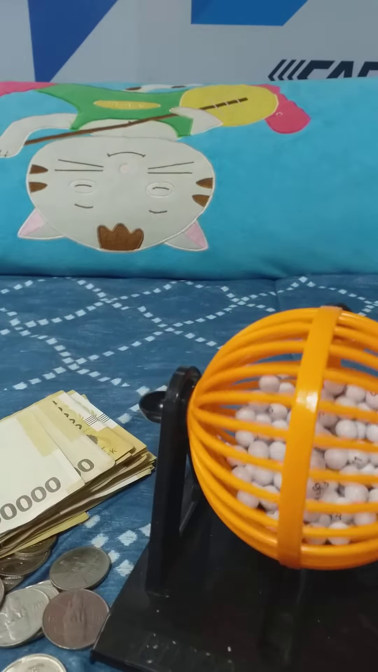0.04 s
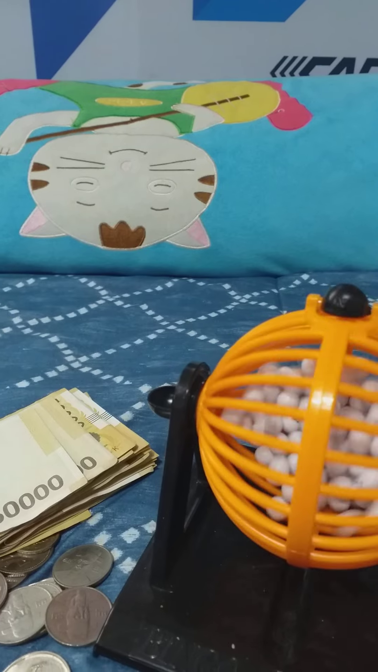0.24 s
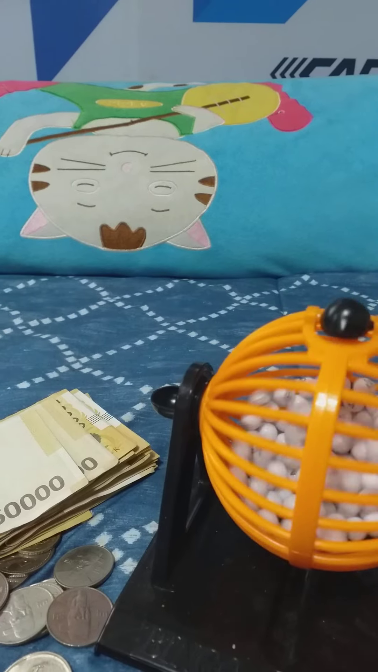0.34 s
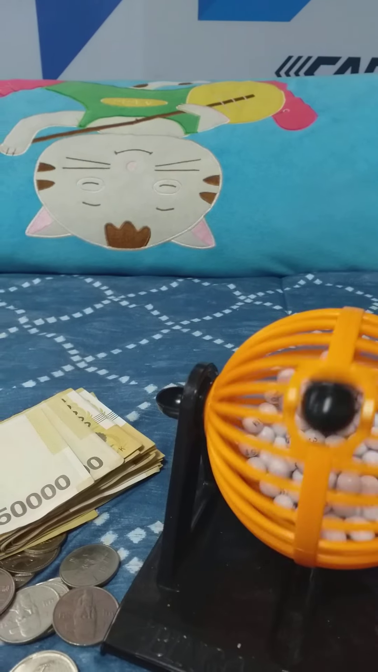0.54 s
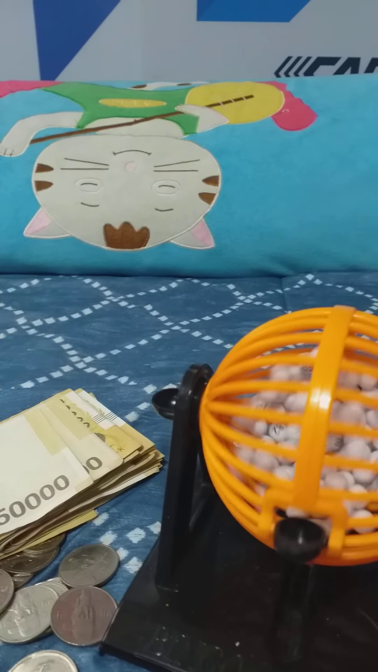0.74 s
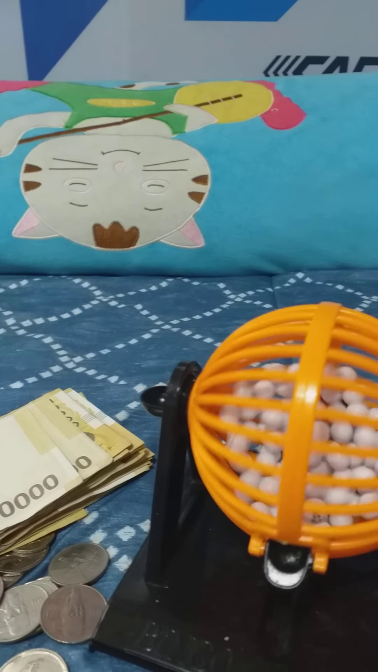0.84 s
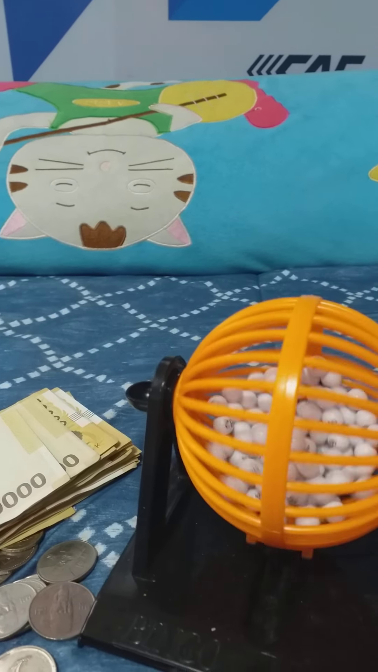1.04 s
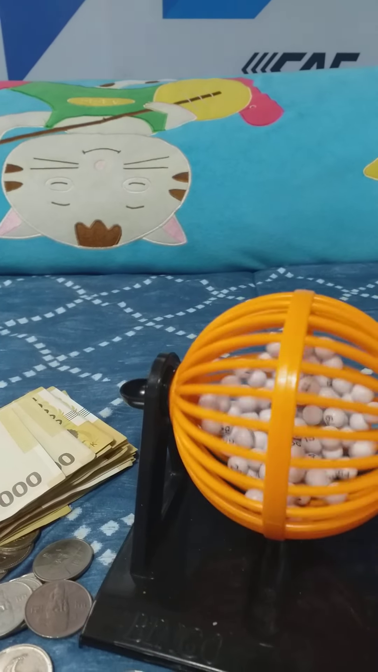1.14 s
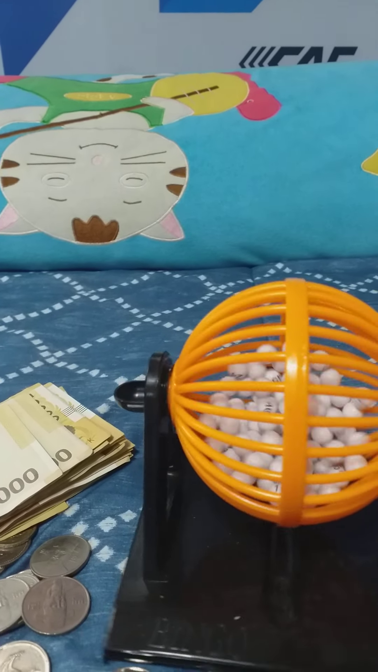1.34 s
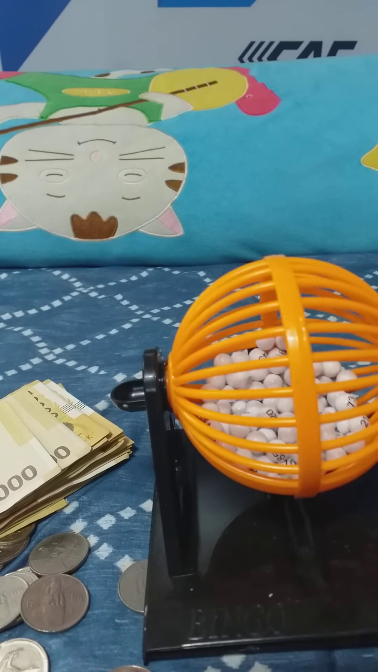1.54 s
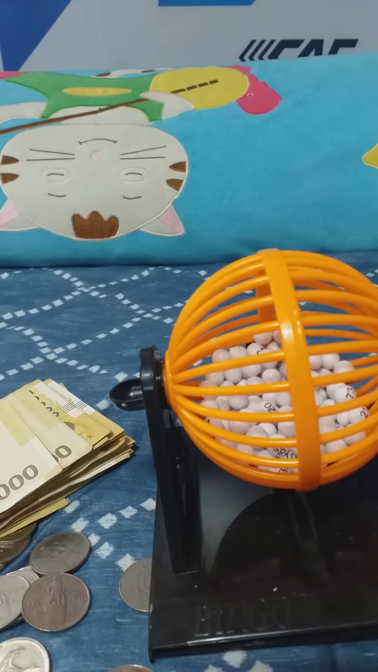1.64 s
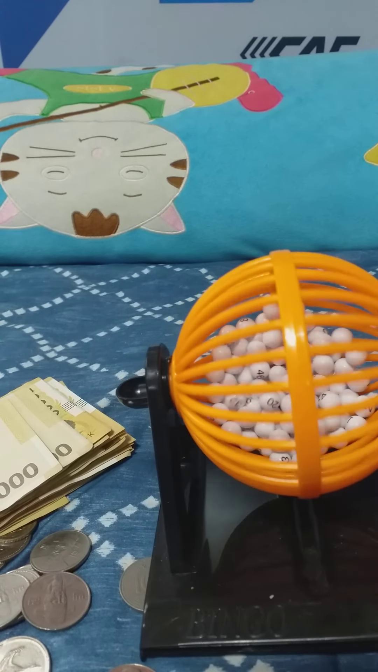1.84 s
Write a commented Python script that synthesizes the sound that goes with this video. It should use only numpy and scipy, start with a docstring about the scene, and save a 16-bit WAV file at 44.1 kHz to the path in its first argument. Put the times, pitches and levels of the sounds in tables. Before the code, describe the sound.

A small plastic cage of light balls tumbles in a dense, bright clatter that thins out.

```python
"""A small plastic cage full of hollow plastic balls is cranked in bursts, close to a phone in a quiet room.
First come room noise, a low hum and a few faint clacks; the noise and hum last to the end.
Then the heap tumbles: many random collisions blend into a dense rattle that swells and sinks.
Single balls clack out of it, and at the end they tick on as the heap settles.
Each collision is a short crack of noise plus brief rings of the ball shells and the cage ribs."""
import sys
import numpy as np
from scipy import signal
from scipy.fft import rfft, irfft
from scipy.io import wavfile
from scipy.ndimage import uniform_filter1d

SR = 44100
rng = np.random.default_rng(int(sys.argv[2]) if len(sys.argv) > 2 else 0)


def output_pcm(signal):
    """Save a mono or channel-first signal as 16-bit PCM at the path in sys.argv[1].

    Samples are clipped to [-1, 1] before scaling.
    """
    pcm = np.clip(np.atleast_2d(signal).T, -1, 1) * 32767
    wavfile.write(sys.argv[1], SR, np.round(pcm).astype(np.int16))


def ratio_of_db(decibels):
    """Turn decibels (scalar or array-like) into linear amplitude factors; 0 dB maps to 1."""
    return 10 ** (np.asarray(decibels, float) / 20)


N = 83790  # length in samples, 1.9 s

# steady noise of the room: (frequency [Hz], relative level per Hz [dB])
ROOM_SPECTRUM = [(35, -15), (60, 2), (427, -7), (566, -4.5), (1040, -14), (1410, -11.5), (1820, -17),
                 (2350, -17), (2970, -19), (6740, -22), (16000, -32)]
# tones of the hum: (frequency [Hz], rms level before the wavering [dB])
HUM_TONES = [(78, -66.5), (100, -70.5), (120, -64.5)]
# ringing notes of a ball shell: (frequency [Hz], relative level [dB], time to fall by 60 dB [s])
BALL_MODES = [(4342, -10.5, 0.033), (5110, -12, 0.035), (6230, 1, 0.011), (6770, 2, 0.023),
              (6875, -9, 0.0083), (7524, -0.5, 0.01), (9940, -0.5, 0.013), (10980, -13.5, 0.013),
              (12570, -5.5, 0.013), (13310, -10, 0.0084)]
# ringing notes of the cage ribs: (frequency [Hz], relative level [dB], time to fall by 60 dB [s])
CAGE_MODES = [(286, -33.5, 0.032), (1136, -15.5, 0.017), (1627, -23, 0.072), (2043, -24, 0.09),
              (2393, -17.5, 0.095), (2967, -25, 0.04), (3676, -20, 0.056)]
# the crack of contact with its near reflections: (frequency [Hz], relative level per Hz [dB])
CRACK_SPECTRUM = [(88, -77), (150, -47), (724, -25.5), (1610, -6), (1770, -18), (2420, -2), (2660, -16),
                  (4330, -10), (5460, -8), (6760, 0), (8710, -7.5), (9790, -8.5), (15600, -2)]
# how hard the heap tumbles: (time [s], level [dB])
TUMBLE_LEVEL = [(0, -54), (.06, -64), (.128, -62), (.148, -47), (0.16, -31), (0.166, -35), (0.188, -28.5),
                (0.198, -41), (0.204, -21.5), (0.222, -30.5), (0.23, -17), (0.32, -13.5), (0.43, -18),
                (0.524, -27), (0.58, -21), (0.594, -29.5), (0.64, -23.5), (0.65, -21.5), (0.692, -21),
                (0.724, -16), (0.886, -13.5), (0.896, -18), (1.036, -23.5), (1.058, -22.5), (1.118, -28.5),
                (1.156, -23.5), (1.17, -25.5), (1.262, -28.5), (1.282, -18.5), (1.348, -28), (1.356, -23),
                (1.42, -27), (1.428, -34.5), (1.445, -26.5), (1.455, -35.5), (1.495, -30.5), (1.51, -50),
                (1.522, -41), (1.53, -39), (1.55, -65), (1.575, -41), (1.62, -61), (1.66, -62), (1.74, -64),
                (1.82, -70), (1.835, -41.5), (1.9, -57.5)]
# treble of the rattle, which shifts over time: (time [s], change [dB])
RATTLE_TREBLE = [(0, -1), (.13, -2), (.3, 3), (.6, 0.5), (.85, 1.5), (1.1, 0.5), (1.3, 1), (1.501, -5),
                 (1.9, -13)]
# single clacks: (time [s], ball level [dB], cage strength against the ball [dB], treble change [dB])
CLACK_LIST = [(0.0288, -30.5, 3, -0.5), (0.0737, -37, 1.5, -13), (0.1362, -34.5, 14, 3),
              (0.14, -33.5, -4, 6), (0.1529, -9, 0, -8), (0.1674, -31.5, 5, 5), (0.1864, -16, -10, -2),
              (0.2044, -16.5, 2, 3), (0.2264, -10, 3, 4), (0.2738, -2.5, -2, -16), (0.2914, -2, -19, 2),
              (0.3234, -2.5, -22, -3), (0.4107, -7, -20, -7), (0.4734, -21, 8, 7), (0.5418, -10.5, -7, -7),
              (0.5622, -19, 20, 3), (0.607, -18.5, 17, 3), (0.6479, -17.5, -13, 15.5),
              (0.7167, -5.5, -3, -13), (0.7265, -6.5, 5.5, -10), (0.7779, -0.5, -9, -18), (0.838, -6, 0, 7),
              (0.8834, -8, 13.5, 14), (1.0253, -20.5, 8, 10), (1.0468, -16, -5, 11),
              (1.078, -25.5, -3, 21.5), (1.0943, -14, 0, 6), (1.1111, -15, 0, -4), (1.1335, -12, -20, 3),
              (1.1513, -7, -9, 0), (1.2256, -8, -9.5, -3), (1.25, -18.5, 8, 3), (1.2745, -7, -25, -3),
              (1.2888, -8.5, -26, -2), (1.3172, -15.5, 3.5, 6), (1.3326, -12.5, 4.5, 0),
              (1.3543, -18, -1, -6), (1.3918, -8.5, -6.5, -5), (1.4307, -9.5, 6, -18),
              (1.4344, -6, -38, -5.5), (1.4394, -10, 0.5, -10), (1.4654, -21.5, 11, 7),
              (1.4928, -19, -9, -16), (1.517, -19.5, 4.5, -2), (1.56, -35.5, 2, 1), (1.5683, -21.5, 1, -14),
              (1.5847, -47, -4, -4), (1.5953, -21.5, 6.5, 2.5), (1.6314, -33, -24, -8),
              (1.6397, -17, -3.5, -4), (1.657, -39, 13, 6.5), (1.6688, -31, -3, -12),
              (1.702, -34.5, 11.5, -1), (1.7536, -33, 10, -10), (1.8359, -31, 9.5, -9),
              (1.8492, -26, -12, -7), (1.8645, -42, 8, -6), (1.876, -32, 6, -6), (1.8934, -33, 6, -8)]
# as the cage turns, the rib note near 1.1 kHz trades strength with the one near 1.6 kHz:
# (time [s], change of the 1.1 kHz note [dB])
RIB_SWING_CURVE = [(0, -0.5), (.3, -0.9), (.6, -2), (.9, -2), (1.2, -1.1), (1.45, 4.5), (1.9, 1)]
# edges of the two bands that hold these rib notes: (bottom [Hz], middle [Hz], top [Hz])
RIB_BAND_EDGES = (850, 1350, 1850)


def level(x, db):
    """Scale a sound to an rms level in dB, that is, to an average strength."""
    return x * ratio_of_db(db) / np.sqrt(np.mean(x ** 2))


def colour(x, points):
    """Shape the spectrum of a sound by (Hz, dB) points, joined along a log frequency axis."""
    hz, db = np.array(points, float).T
    f = np.maximum(np.fft.rfftfreq(len(x), 1 / SR), 1)
    gain = ratio_of_db(np.interp(np.log(f), np.log(hz), db))
    return irfft(rfft(x) * gain, len(x))


def butter(x, hz, kind, order=2):
    """Keep only the sound below ("low") or above ("high") a frequency."""
    return signal.sosfilt(signal.butter(order, hz, kind, fs=SR, output="sos"), x)


def fade(t, t60):
    """Die away smoothly, falling by 60 dB in t60 seconds."""
    return np.exp(-np.log(1000) * t / t60)


def curve(points):
    """Join (time, value) points by straight lines over the whole scene."""
    return np.interp(np.arange(N) / SR, *np.array(points).T)


def tilt(x, db):
    """Lift or lower the treble, by one amount or one that changes over time."""
    edge_hz = 9150
    f = np.fft.rfftfreq(len(x), 1 / SR)
    treble = irfft(rfft(x) / (1 + (edge_hz / (f + 1)) ** 12), len(x))
    return x + (ratio_of_db(db) - 1) * treble


def room():
    """Steady coloured noise plus a low hum of sine tones, each wavering slowly in strength."""
    noise_db = -56
    t = np.arange(N) / SR
    hum = np.zeros(N)
    for hz, db in HUM_TONES:
        drift = uniform_filter1d(rng.standard_normal(N), size=3000)
        waver = 1.5 + 0.52 * level(drift, 0)
        hum += ratio_of_db(db) * np.sqrt(2) * waver * np.sin(2 * np.pi * hz * t)
    return level(colour(rng.standard_normal(N), ROOM_SPECTRUM), noise_db) + hum


def ring(modes, detune, t):
    """A blow sets off several fading notes, each a little off in pitch, strength and phase."""
    scatter_db = 3.5
    hz, db, t60 = np.array(modes, float).T[:, :, None]
    pitch_off, strength_off, phase_off = rng.standard_normal((3, len(modes), 1))
    strength = ratio_of_db(db + scatter_db * strength_off)
    hz = hz * (1 + detune * pitch_off)
    notes = strength * fade(t, t60) * np.sin(2 * np.pi * hz * t + 2 * phase_off)
    return np.sum(notes, axis=0)


def collision(cage_db, size=9000):
    """A blow cracks, rings the ball shell and the cage ribs, and leaves a dull tail in the room."""
    ball_detune, cage_detune = 0.028, 0.017  # typical pitch error, as a share of the pitch
    contact_s, lowest_hz, cage_top_hz = 0.00068, 222, 3460
    crack_t60_s, treble_t60_s = 0.026, 0.018
    echo_db, echo_t60_s, echo_top_hz = -20.5, 0.37, 7140
    t = np.arange(size) / SR
    rise = np.minimum(t / contact_s, 1)
    # the cage sets the strength of the lower part of the crack
    noise = level(colour(rng.standard_normal(size), CRACK_SPECTRUM), 3.5)
    body = butter(noise, cage_top_hz, "low", order=4)
    crack = butter(noise, cage_top_hz, "high", order=4) + ratio_of_db(cage_db) * body
    # the treble of the crack dies away sooner than the rest
    dull_crack = tilt(crack, -66) * fade(t, crack_t60_s)
    bright_crack = (crack - tilt(crack, -52)) * fade(t, treble_t60_s)
    ball = rise * (ring(BALL_MODES, ball_detune, t) + dull_crack + bright_crack)
    echo = butter(crack, echo_top_hz, "low", order=4)
    echo = ratio_of_db(echo_db) * echo * fade(t, echo_t60_s) * rise
    cage = rise * ratio_of_db(cage_db) * ring(CAGE_MODES, cage_detune, t)
    # scale by the peak of the ball and crack together
    return butter(ball + echo + cage, lowest_hz, "high") / np.abs(ball).max()


def tumble(count=36):
    """Balls collide at random times, more often and harder as the heap surges."""
    full_rate, thinning = 3500, 0.42  # collisions a second at full tumble; share of the level change in dB
    cage_db, size_scatter_db = 1.35, 2.5
    surge_s, surge_db = 0.02, 1.08
    push_db = curve(TUMBLE_LEVEL)
    loudest_db = max(db for _, db in TUMBLE_LEVEL)
    rate = full_rate * ratio_of_db(thinning * (push_db - loudest_db))
    # random steps with softened edges make the strength flutter
    k = int(surge_s * SR)
    steps = np.repeat(rng.standard_normal(N // k + 1), k)
    surge = uniform_filter1d(steps, k // 2)[:N]
    # sparser collisions are made stronger, so that the level follows the table
    strength = ratio_of_db(push_db + surge_db * surge) * np.sqrt(SR / rate)
    rattle = np.zeros(N)
    for _ in range(count):  # each round repeats one collision sound at its own random times
        hit = rng.random(N) < rate / count / SR
        size = ratio_of_db(size_scatter_db * rng.exponential(size=N))
        one = collision(cage_db)
        one = one / np.sqrt(np.sum(one ** 2) * np.mean(size ** 2))
        rattle += signal.fftconvolve(hit * size * strength, one)[:N]
    return tilt(rattle, curve(RATTLE_TREBLE))


def clacks():
    """Single balls strike ribs or each other, each at its listed time."""
    out = np.zeros(N + SR)
    for start_s, db, cage_db, treble_db in CLACK_LIST:
        one = ratio_of_db(db) * tilt(collision(cage_db), treble_db)
        i = int(start_s * SR)
        out[i:i + len(one)] += one
    return out[:N]


def swing_ribs(cage):
    """As the cage turns, the bands around two rib notes trade strength: one gains the dB the other loses."""
    swing = ratio_of_db(curve(RIB_SWING_CURVE))
    bottom, middle, top = RIB_BAND_EDGES
    f, spectrum = np.fft.rfftfreq(N, 1 / SR), rfft(cage)
    band_near_1100_hz = irfft(spectrum * (f > bottom) * (f <= middle), N)
    band_near_1600_hz = irfft(spectrum * (f > middle) * (f <= top), N)
    return cage + (swing - 1) * band_near_1100_hz + (1 / swing - 1) * band_near_1600_hz


def scene():
    """Add the cage and the room together at one microphone."""
    cage = swing_ribs(tumble() + clacks())
    return (cage + room())[None]


def band_limit(x):
    """A steep low-pass at the top of the band."""
    return signal.sosfilt(signal.butter(12, 16820, fs=SR, output="sos"), x)


def record(dry):
    """The phone rounds the loudest peaks, then cuts the deep bass and the very top."""
    ceiling, bass_hz, top_hz = 1.1, 59, 15720  # ceiling: 1 is full scale
    rounded = ceiling * np.tanh(dry / ceiling)
    without_bass = butter(rounded, bass_hz, "high", order=3)
    top_cut = signal.ellip(12, 0.5, 60, top_hz, fs=SR, output="sos")
    mix = signal.sosfilt(top_cut, without_bass)
    return band_limit(mix)


dry = scene()
out = record(dry)
output_pcm(out)
```